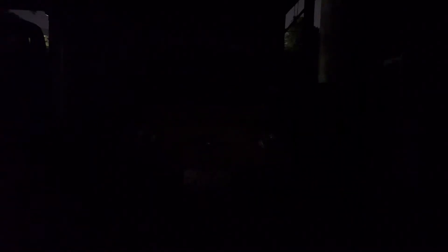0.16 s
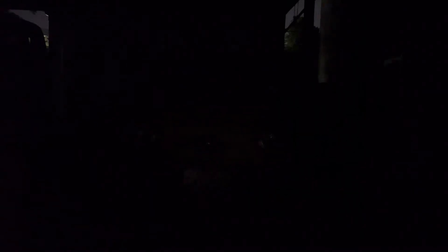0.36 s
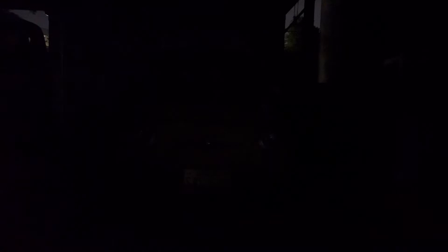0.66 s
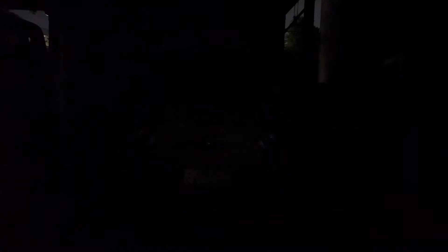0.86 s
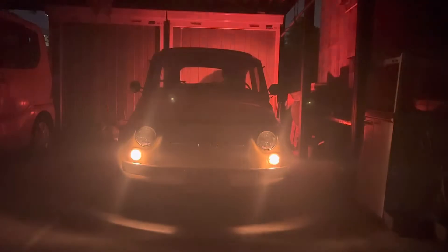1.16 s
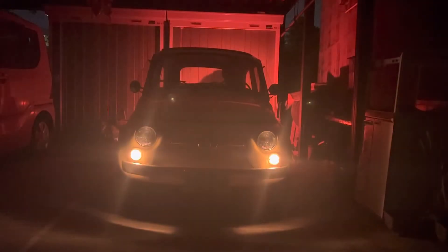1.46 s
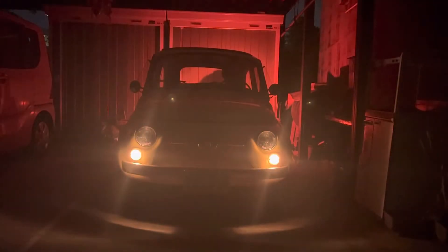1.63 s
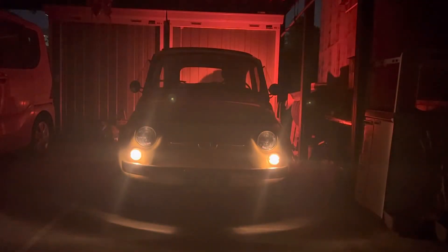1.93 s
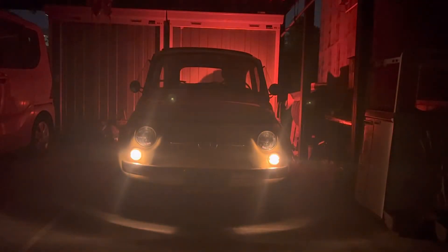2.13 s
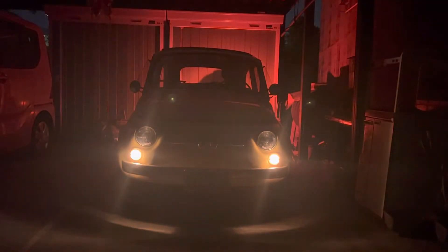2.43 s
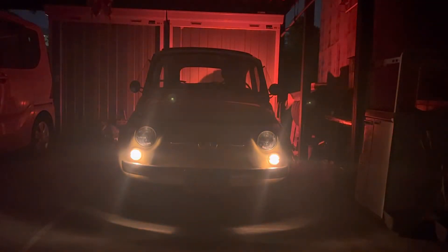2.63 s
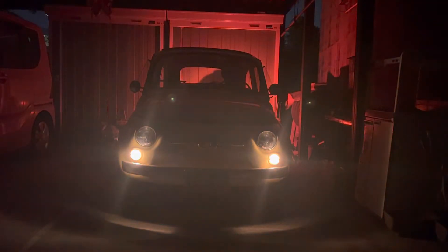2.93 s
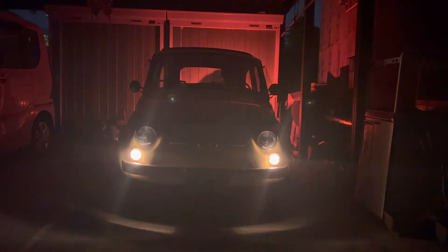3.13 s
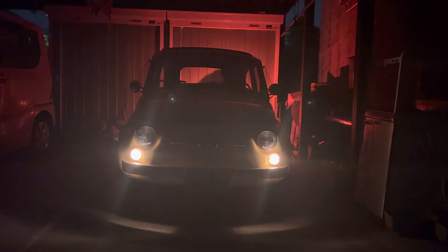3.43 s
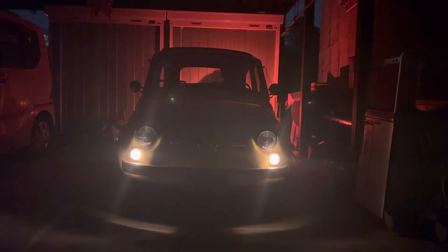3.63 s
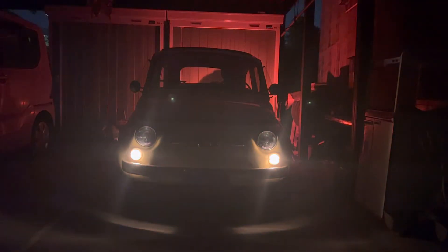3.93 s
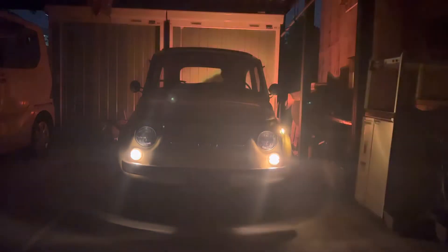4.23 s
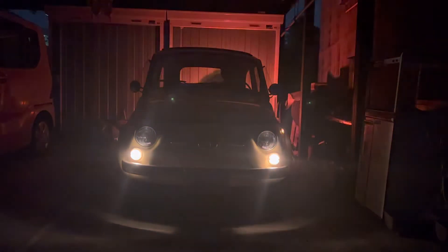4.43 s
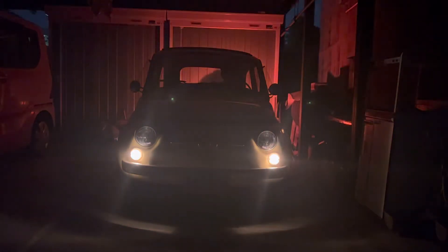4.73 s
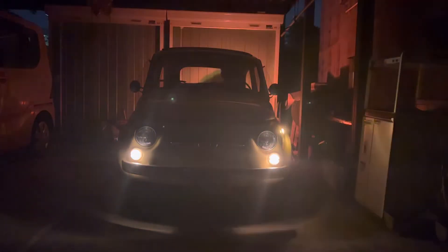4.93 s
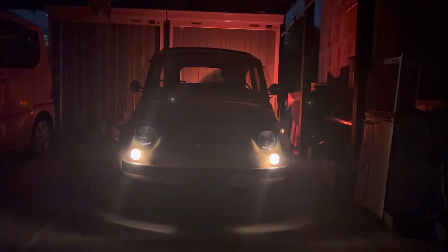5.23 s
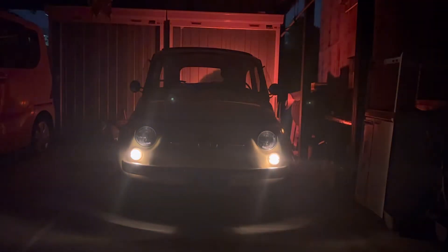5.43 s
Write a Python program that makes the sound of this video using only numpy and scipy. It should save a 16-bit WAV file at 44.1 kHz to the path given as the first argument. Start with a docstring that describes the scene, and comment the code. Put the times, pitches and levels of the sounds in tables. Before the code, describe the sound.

Close, chugging idle of a small two-cylinder car engine, with ticking valves and fan roar, gradually sagging into a slower, uneven sputter.

```python
"""A walled yard at night, two close microphone ports in front of a small two-cylinder air-cooled engine.
From the start it idles at about 29 firings a second: each thumps through the exhaust and off the walls,
casing and panels ring, and valve gear clinks over the roar of the cooling fan and casing.
At 0.65 s the sound jumps once, with a click, like a cut. From 2 s on firings often miss and the engine
slows to about 20 a second near 4.7 s, where the tailpipe barks; then it picks up a little and settles."""
import sys
import numpy as np
from scipy import signal
from scipy.fft import rfft, irfft
from scipy.io import wavfile
from scipy.ndimage import uniform_filter1d

SR = 44100
rng = np.random.default_rng(int(sys.argv[2]) if len(sys.argv) > 2 else 0)


def waveform_to_disk(signal):
    """Save audio, clipped to [-1, 1], as 16-bit WAV at the path in sys.argv[1]."""
    frames = np.transpose(np.atleast_2d(signal))
    scaled = np.clip(frames, -1, 1) * 32767
    samples = np.round(scaled).astype(np.int16)
    wavfile.write(sys.argv[1], SR, samples)


N = 246078

# engine speed: (time [s], firing rate [1/s])
SPEED = [(0.0, 28.797), (0.3, 29.378), (0.6, 29.461), (0.9, 29.259), (1.2, 28.959), (1.5, 28.359),
         (1.8, 28.236), (2.0, 27.393), (2.15, 27.013), (2.3, 26.819), (2.45, 26.736), (2.6, 26.548),
         (2.75, 26.093), (2.9, 25.025), (3.05, 24.859), (3.2, 24.939), (3.35, 24.872), (3.5, 24.763),
         (3.65, 24.441), (3.8, 24.168), (3.95, 24.033), (4.1, 23.244), (4.25, 23.07), (4.4, 21.247),
         (4.55, 19.714), (4.7, 19.527), (4.85, 19.999), (5.0, 20.231), (5.15, 20.697), (5.3, 20.663),
         (5.45, 21.097), (5.6, 21.516)]
FAST_PER_S = 29  # firing rate of the opening idle


def gain_of(db):
    """dB to amplitude."""
    return 10 ** (np.asarray(db) / 20)


def firing_rate(t):
    """Firings per second at times t."""
    return np.interp(t, *np.transpose(SPEED))


def by_speed(t, fast_db, db_per_octave):
    """A level in dB at times t: fast_db at the opening idle, changing with each octave of engine speed."""
    return fast_db + db_per_octave * np.log2(firing_rate(t) / FAST_PER_S)


def over(table, hz):
    """Columns of a spectrum, interpolated on a log-frequency axis."""
    f, *columns = np.transpose(table)
    return [np.interp(np.log(hz + 1), np.log(f + 1), c) for c in columns]


def train(times, size):
    """Clicks of the given sizes at the given times."""
    at = np.round(times * SR).astype(int)
    inside = (at >= 0) & (at < N)
    return np.bincount(at[inside], size[inside], N)


def struck(times, size, modes, ring_s=.5):
    """Blows, some before the start, each ringing the modes as dying sines."""
    t = np.arange(round(ring_s * SR)) / SR
    ring = sum(a * gain_of(-60 * t / t60) * np.sin(2 * np.pi * hz * t) for hz, a, t60 in modes)
    blows = np.bincount(np.round((times + ring_s) * SR).astype(int), size, 2 * N)
    return signal.oaconvolve(blows, ring)[len(t):][:N]


def firings(first_s=.0087, jump_s=.65, jump_turns=.339, uneven=.07):
    """Times and strengths of the firings, one to each turn; the sound jumps once, like a cut."""
    # weak and missed firings: (time [s], strength [1 = full charge, below 0 the pipe sucks back])
    misses = [(0.703, 0.51), (1.113, 0.56), (1.958, -0.31), (2.177, -0.33), (2.326, -0.36), (2.551, -0.27),
              (2.702, -0.04), (2.858, -0.09), (2.898, 0.68), (2.937, -0.27), (3.097, 0.63), (3.258, -0.22),
              (3.499, 0.31), (3.662, 0.38), (3.827, -0.46), (3.868, -0.23), (3.994, 0.28), (4.036, 0.44),
              (4.164, -0.46), (4.295, 0.36), (4.385, -0.05), (4.432, -0.15), (4.481, 0.4), (4.531, -0.22),
              (4.632, -0.31), (5.132, -0.01), (5.47, 0.64), (5.517, 0.57)]
    t = np.arange(N) / SR
    turns = np.cumsum(firing_rate(t)) / SR - jump_turns * (t > jump_s)
    turns = np.maximum.accumulate(turns - turns[round(first_s * SR)])
    beats = np.interp(np.arange(int(turns[-1]) + 1), turns, t)
    strength = 1 + uneven * rng.standard_normal(len(beats))
    for miss_s, weak in misses:
        strength[np.argmin(abs(beats - miss_s))] = weak
    return beats, strength


def already_running(beats):
    """Five more turns before the start, so the engine is heard in full swing."""
    return np.r_[beats[0] - np.arange(1, 6) * (beats[1] - beats[0]), beats]


def exhaust(beats, strength, jitter_s=.00015):
    """Each firing rings the pipe and reaches the microphone along four paths; slow ones thump harder."""
    # exhaust pipe modes: (frequency [Hz], relative amplitude, t60 [s])
    pipe = [(61.4, -0.193, 0.1), (77.3, 0.526, 0.0187), (166.5, -0.021, 0.27), (202, -0.065, 0.07)]
    # tailpipe bark: (frequency [Hz], relative amplitude, t60 [s])
    bark_modes = [(95, 0.08, 0.01)]
    # arrivals from the intake suck, the tailpipe and two walls: (time after the firing [s], gain)
    paths = [(-0.0117, -0.505), (-0.0021, 1.0), (0.0191, 0.583), (0.031, 0.253)]
    beats = already_running(beats)
    size = np.r_[strength[:5], strength] * gain_of(by_speed(beats, .13, -3.5))
    fired_s = beats + jitter_s * rng.standard_normal(len(beats))  # charges burn a little early or late
    deep, upper = gain_of(by_speed(beats, .4, 4)), gain_of(by_speed(beats, .47, 4.8))
    intake = gain_of(by_speed(beats, 0, 7))  # the suck rings less when slow
    thumps = np.zeros(N)
    for (delay_s, gain), fade in zip(paths, (intake, 1, 1, 1)):
        for share, modes in ((deep, pipe[:1]), (fade, pipe[1:2]), (fade * upper, pipe[2:])):
            thumps += struck(fired_s + delay_s, gain * size * share, modes)
    bark_size = size * gain_of(by_speed(beats, -18, -36))  # comes out only when slow
    return thumps + struck(fired_s + .0067, bark_size, bark_modes)


def casing(beats, lead_s=.0119):
    """Casing and air box ring at every turn, fired or not, and shake less when slow."""
    # casing and air box modes: (frequency [Hz], relative amplitude, t60 [s])
    modes = [(48, -0.0287, 0.3), (83.8, 0.0335, 0.2), (95.9, 0.0092, 0.4), (167, 0.0224, 0.32),
             (257.9, 0.0108, 0.26)]
    beats = already_running(beats)
    return struck(beats - lead_s, gain_of(by_speed(beats, 1.4, 10)), modes)


def panels(beats, strength, unfired_share=.58, uneven_db=2):
    """Sheet metal hums, each panel shaken at its own moment of the turn, less when slow or on a miss."""
    # one mode to a panel: (frequency [Hz], relative amplitude, t60 [s])
    modes = [(529.5, 0.0036, 0.21), (552.6, 0.011, 0.32), (570.5, 0.01, 0.28), (622, 0.02, 0.079),
             (761, 0.0066, 0.25), (840.3, 0.0063, 0.16), (910.8, 0.0049, 0.22), (1018, 0.0094, 0.099),
             (1080, 0.0033, 0.64)]
    shake = unfired_share + (1 - unfired_share) * np.clip(strength, 0, 2)
    size = shake * gain_of(by_speed(beats, .29, 12))
    chance = gain_of(uneven_db * rng.standard_normal((len(beats), len(modes))))
    moments = np.arange(len(modes)) * (np.sqrt(5) - 1) / 2 % 1 - .5  # spread evenly over the turn
    return sum(struck(beats + moments[k] / firing_rate(beats), size * chance[:, k], [mode])
               for k, mode in enumerate(modes))


def charge_puffs(beats, strength, lead_s=.02, length_s=.026):
    """A smooth bump at each burning charge, just ahead of its thump."""
    charges = train(beats - lead_s, np.clip(strength, 0, 2))
    return signal.oaconvolve(charges, np.hanning(round(length_s * SR)))[:N]


def fan_roar(puffs, hop=128, window=512):
    """Noise of fan and casing through the shroud; its treble swells with each burning charge."""
    # spectrum of the roar at the left port: (frequency [Hz], relative level [dB])
    spectrum = [(25, -44), (50, -6), (100, -12), (150, -13.5), (205, -11), (270, -12.5), (380, -17.5),
                (600, -14.5), (1000, -16.5), (1600, -23.5), (3600, -24.5), (5300, -28.5), (6300, -32.5),
                (8200, -33), (11800, -32.5), (15000, -38)]
    # casing and fan shroud resonances: (frequency [Hz], width [Hz], gain [dB])
    shroud = [(95, 22, 6), (168, 18, 7), (265, 25, 3), (555, 90, 4), (705, 30, -7), (836, 30, 4),
              (880, 35, -6), (925, 25, 6), (1130, 30, -4), (965, 60, -7.5), (1080, 45, 6), (1940, 70, 3),
              (2130, 40, 3)]
    sample_s, t = np.arange(N) / SR, np.arange(N // hop + 5) * hop / SR
    hz = np.fft.rfftfreq(window, 1 / SR)[:, None]
    real, imag, patches = rng.standard_normal((2, len(t), len(hz), 3)).transpose(3, 0, 2, 1)
    patches = uniform_filter1d(uniform_filter1d(patches[0], 6, 0), 12, 1)
    flicker_db = patches / np.sqrt(np.mean(patches ** 2))
    treble = np.clip(np.log(hz / 1200 + 1e-9) / np.log(3.5), 0, 1)
    bass = np.clip((210 - hz) / 110, 0, 1)
    level_db = by_speed(t, -34.5, 6.8)
    treble_db = by_speed(t, -2.17, -.6)  # the treble falls less than the body
    swell_db = by_speed(t, 1, -6.5) * np.interp(t, sample_s, puffs - puffs.mean())
    rumble_db = by_speed(t, -2, -20)  # the bass grows as the engine labours
    burn = np.interp(t, sample_s, uniform_filter1d(puffs, 1800) / firing_rate(sample_s))
    sag_db = burn / burn.mean() - 1  # the body sags when charges miss
    shape_db = treble * (treble_db + swell_db) + (1 - treble) * sag_db + bass * rumble_db
    field = (real + 1j * imag) * gain_of(level_db + flicker_db + shape_db)
    noise = signal.istft(field, nperseg=window, noverlap=window - hop)[1][:, :N]
    noise /= np.sqrt(np.mean(noise ** 2) / np.mean(gain_of(2 * level_db)))
    fine_hz = np.fft.rfftfreq(N, 1 / SR)
    shroud_db = sum(db / (1 + (2 * (fine_hz - f) / width) ** 2) for f, width, db in shroud)
    colour = gain_of(over(spectrum, fine_hz)[0] + shroud_db)
    colour /= np.sqrt(np.mean(colour ** 2 * (fine_hz > 300) * (fine_hz < 2500)))  # the body sets the level
    return irfft(rfft(noise) * colour, N)


def rattle(times, level_db, modes, part_hz, spread_s, count=10):
    """A few quick taps in each blow, most at its start; modes near the struck part's pitch ring most."""
    # neighbouring parts ring a little apart: (frequency ratio)
    detunes = (.983, .994, 1.005, 1.017)
    t, out = np.arange(SR // 16) / SR, np.zeros((2, N))
    attack = np.minimum(t / .0012, 1)
    for hz, db, t60 in modes:
        when, sign, part = rng.random((len(times), 3, 2, count)).transpose(1, 0, 2, 3)
        tap_s = times[:, None, None] + spread_s * when ** 2
        share = .38 + np.exp(-(np.log(hz / part_hz) / .081) ** 2)
        size = (gain_of(level_db) * share)[:, None, None] * np.sign(sign - .5) / np.sqrt(count)
        for j, detune in enumerate(detunes):
            ring = attack * gain_of(db - 60 * t / t60) * np.sin(2 * np.pi * hz * detune * t)
            on_part = size * ((part * len(detunes)).astype(int) == j)
            taps = [train(tap_s[:, k].ravel(), on_part[:, k].ravel()) for k in range(2)]
            out += signal.oaconvolve(taps, ring[None], axes=1)[:, :N]
    return out


def valves(beats, strength, gear_db=-44, tappet_db=-48, scatter_db=2, gear_lead_s=.013, tick_lead_s=.008):
    """Gear clinks and tappets tick at each strong firing; loose gear rattles between, loud blows on top."""
    # valve gear modes: (frequency [Hz], relative level [dB], t60 [s])
    gear_modes = [(1930, -2, 0.049), (2164, -10, 0.032), (2684, -10, 0.052), (3170, -5.5, 0.071),
                  (3470, -1.5, 0.082), (3610, -6, 0.06), (3680, -23, 0.043), (3863, -1.5, 0.093),
                  (4174, -1.5, 0.097), (4510, -4, 0.09), (4730, -1, 0.077), (4880, -5.5, 0.045),
                  (5304, 3.5, 0.025)]
    # tappet modes: (frequency [Hz], relative level [dB], t60 [s])
    tappet_modes = [(6870, 0.5, 0.02), (7300, 1.3, 0.042), (7670, 1, 0.017), (8100, 4.4, 0.0092)]
    # accented clinks: (time [s], relative level [dB], pitch of the part struck [Hz])
    clinks = [(0.006, -30.5, 1930), (0.077, -39, 1930), (0.147, -34, 1960), (0.176, -39, 4730),
              (0.2029, -40, 4690), (0.2813, -44, 3480), (0.341, -34, 3630), (0.376, -37, 4700),
              (0.448, -34, 1950), (0.577, -35, 4650), (0.664, -40, 3650), (0.732, -35, 3650),
              (0.915, -38, 1950), (0.9348, -45, 3470), (1.075, -33, 1950), (1.243, -37, 4750),
              (1.276, -38, 5300), (1.455, -37, 4730), (1.5599, -39, 3640), (1.6257, -36, 5000),
              (1.8731, -35.5, 3900), (1.9086, -34, 3600), (2.025, -40, 4730), (2.06, -39, 3750),
              (2.135, -40, 4400), (2.2079, -39, 3720), (2.2443, -41, 4100), (2.285, -41, 4730),
              (2.394, -40, 4730), (2.4665, -36, 4730), (2.4987, -39, 3620), (2.5556, -42, 4730),
              (2.583, -40, 4730), (2.615, -42, 4170), (2.771, -40, 4100), (2.886, -38, 5300),
              (2.9417, -37, 5280), (3.051, -46, 3740), (3.1245, -40, 3700), (3.2096, -36.5, 3610),
              (3.3258, -35, 4600), (3.455, -37, 1950), (3.616, -40, 1950), (3.7385, -42, 4150),
              (3.785, -39, 1950), (3.8995, -36, 4730), (3.9444, -45, 3510), (4.0685, -36.5, 3870),
              (4.115, -40, 4580), (4.199, -44, 4670), (4.2433, -48, 4740), (4.57, -39, 3510),
              (4.672, -41, 3460), (4.7237, -42, 4730), (4.8247, -40, 3740), (4.8728, -34, 3630),
              (4.922, -44, 3900), (4.9776, -42, 4510), (5.025, -42, 3930), (5.0739, -44, 4130),
              (5.1773, -40, 4680), (5.21, -35.5, 4730), (5.265, -48, 4700), (5.4116, -42, 3900),
              (5.5603, -43, 3940)]
    # accented tappet ticks: (time [s], relative level [dB])
    ticks = [(0.035, -39), (0.3117, -38.5), (0.4444, -41), (0.5142, -39.5), (0.618, -44), (1.0031, -39.5),
             (1.037, -41), (1.0715, -40), (1.1418, -50), (1.2423, -37), (1.281, -40), (1.3848, -39),
             (1.5234, -40), (1.5618, -38), (1.773, -44), (1.878, -39), (1.915, -36), (2.2455, -39),
             (2.434, -44), (2.583, -44), (2.6199, -46), (2.7347, -44), (2.7704, -41), (3.052, -44),
             (3.211, -38), (3.4528, -40), (3.5344, -45), (3.945, -42), (4.114, -41), (4.7267, -37),
             (5.174, -44), (5.271, -41.5)]
    burning_s = beats[strength > .6]
    chance_db = scatter_db * rng.standard_normal((len(burning_s), 2))
    loose_s = (beats[:-1, None] + rng.random((len(beats) - 1, 4)) * np.diff(beats)[:, None]).ravel()
    clink_s, clink_db, part_hz = np.transpose(clinks)
    clink_s = np.r_[clink_s, burning_s - gear_lead_s, loose_s]
    clink_db = np.r_[clink_db, gear_db + chance_db[:, 0], by_speed(loose_s, -45.5, 1.9)]
    part_hz = np.r_[part_hz, rng.uniform(1780, 5860, len(burning_s) + len(loose_s))]
    gear = rattle(clink_s, clink_db, gear_modes, part_hz, spread_s=.016)
    tick_s, tick_db = np.transpose(ticks)
    tick_s = np.r_[tick_s, burning_s - tick_lead_s]
    tick_db = np.r_[tick_db, tappet_db + chance_db[:, 1]]
    return gear + rattle(tick_s, tick_db, tappet_modes, part_hz=7400, spread_s=.006)


def click(at_s=.6511, size=-.2, drop_s=.00012, fade_s=.004):
    """One click where the sound jumps: a quick step that dies away at once."""
    t = np.maximum(np.arange(N) / SR - at_s, 0)
    return size * (1 - np.exp(-(t / drop_s) ** 2)) * np.exp(-t / fade_s)


def stereo_image(direct, scattered):
    """Direct sound on the left; on the right a phase-shifted copy, plus sound scattered by the yard."""
    # right channel against left: (frequency [Hz], likeness [0-1], phase lead [rad])
    # in the treble hiss the channels are opposite near 10 kHz, identical near 13.5 kHz
    coherence = [(60, .997, 0), (340, .95, -.1), (860, .72, -.1), (1300, .74, 0), (1900, .62, -.15),
                 (3000, .62, -.8), (5000, .7, -.7), (6000, .3, .2), (6600, .88, 0), (7600, .8, .45),
                 (8600, .66, 1.4), (9300, 1, np.pi), (10950, 1, np.pi), (11100, .7, 4.05),
                 (12250, .62, 5.4), (12700, 1, 2 * np.pi), (14350, 1, 2 * np.pi), (14800, .56, 7.3),
                 (15400, .6, 9)]
    # channel balance: (frequency [Hz], left minus right [dB])
    balance = [(60, 1), (200, 2), (700, 3.5), (1300, 2), (3000, 3.8), (5000, 3.5), (6500, 1), (8500, 0),
               (15000, 0)]
    hz = np.fft.rfftfreq(N, 1 / SR)
    likeness, lead = over(coherence, hz)
    right = likeness * np.exp(1j * lead) * rfft(direct) + np.sqrt(1 - likeness ** 2) * rfft(scattered)
    right /= gain_of(over(balance, hz)[0])
    return np.array([direct, irfft(right, N)])


def scene(echo_s=.011):
    """The engine from close in front, with the yard around it."""
    beats, strength = firings()
    thud = exhaust(beats, strength) + casing(beats) + panels(beats, strength)
    direct, scattered = fan_roar(charge_puffs(beats, strength)) + valves(beats, strength)
    echo = np.r_[np.zeros(round(echo_s * SR)), thud][:N]  # the beat returns from the side of the yard
    return stereo_image(direct + thud, scattered + echo) + click()


def record(dry, low_hz=4, edge_hz=15750):
    """The microphone passes no steady pressure; then the band ends steeply in the high treble."""
    passed = signal.sosfilt(signal.butter(1, low_hz, "high", fs=SR, output="sos"), dry)
    band_limit = signal.firwin(1023, edge_hz, window=("kaiser", 10), fs=SR)
    return signal.oaconvolve(passed, band_limit[None], "same")


dry = scene()
out = record(dry)
waveform_to_disk(out)
```